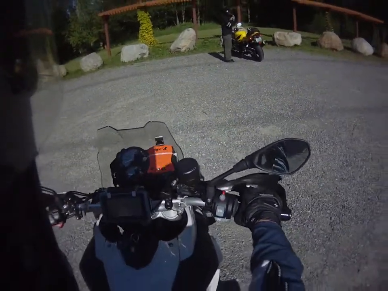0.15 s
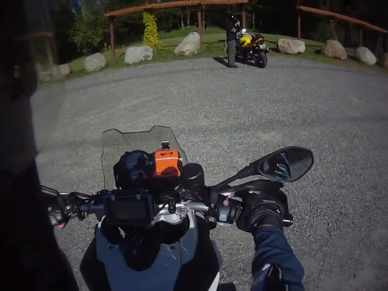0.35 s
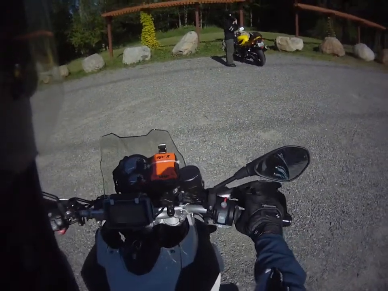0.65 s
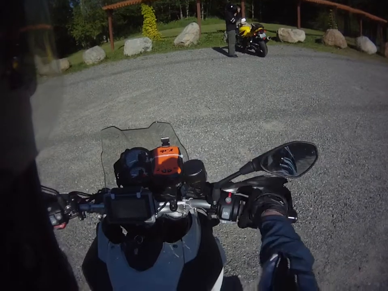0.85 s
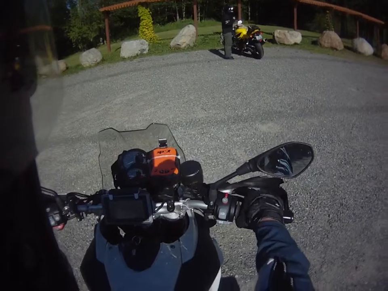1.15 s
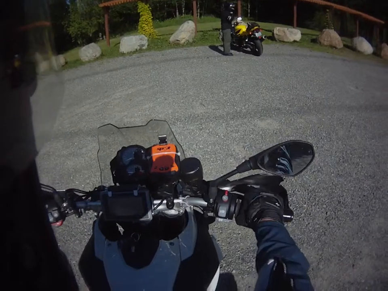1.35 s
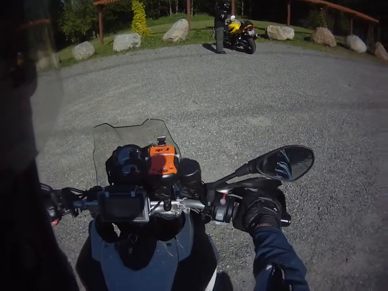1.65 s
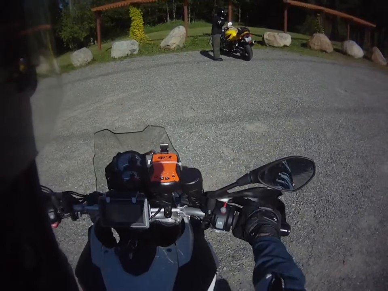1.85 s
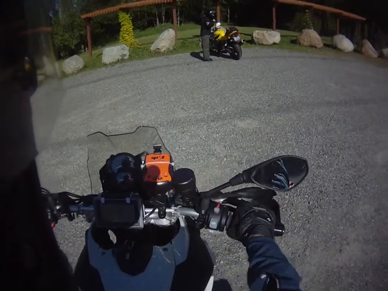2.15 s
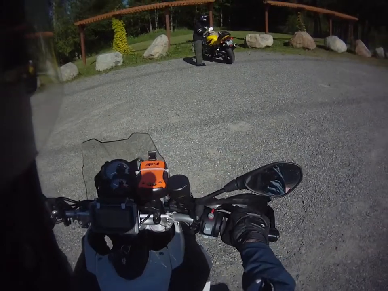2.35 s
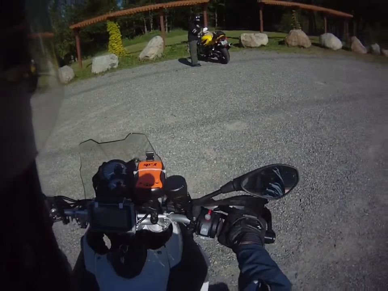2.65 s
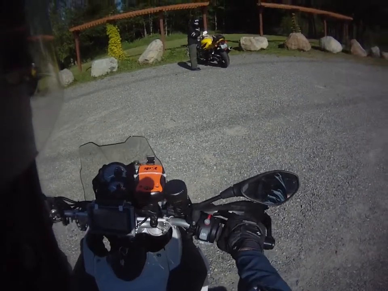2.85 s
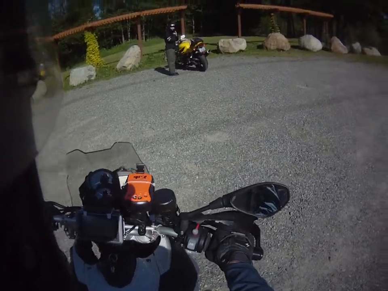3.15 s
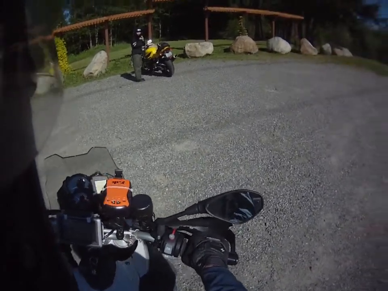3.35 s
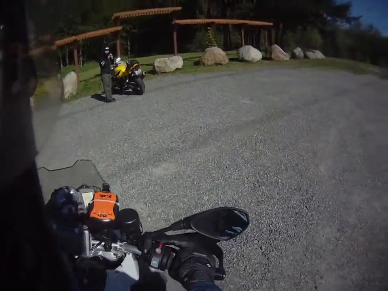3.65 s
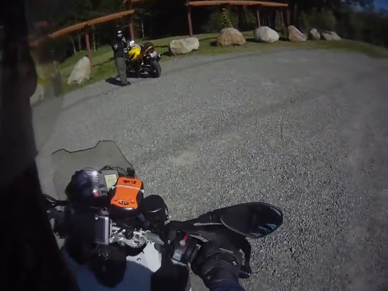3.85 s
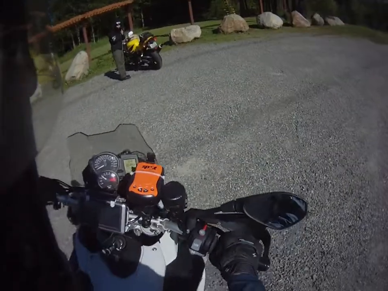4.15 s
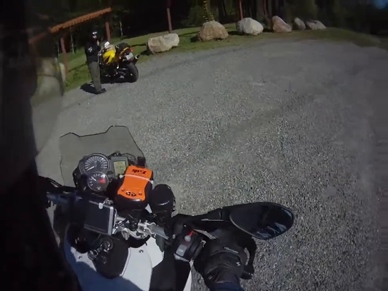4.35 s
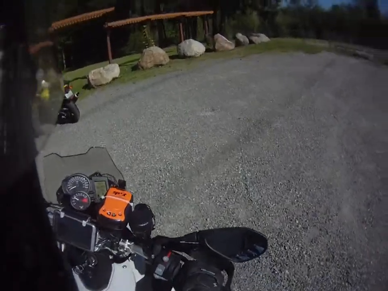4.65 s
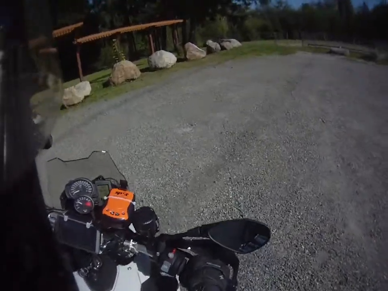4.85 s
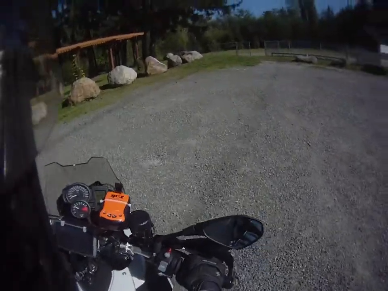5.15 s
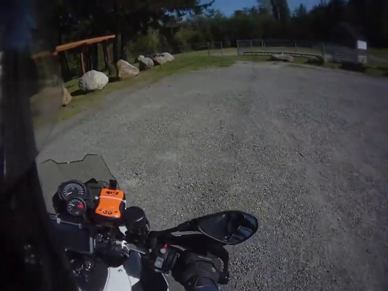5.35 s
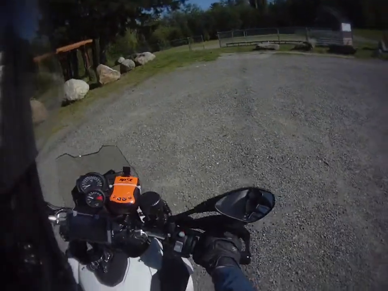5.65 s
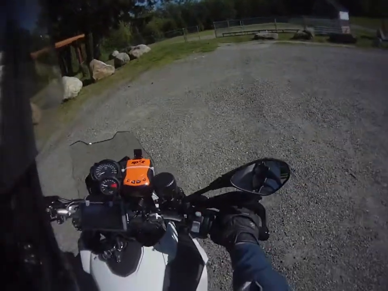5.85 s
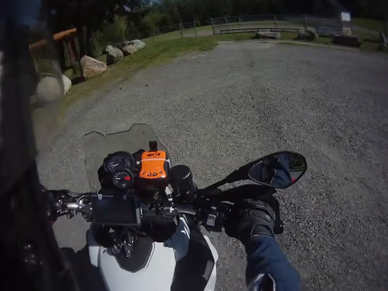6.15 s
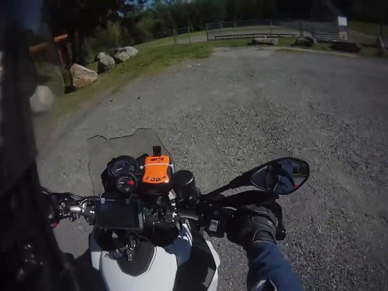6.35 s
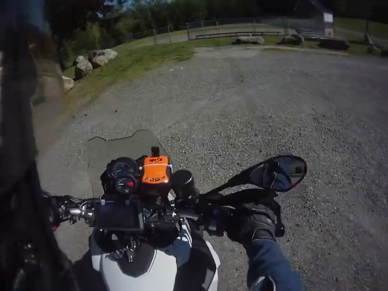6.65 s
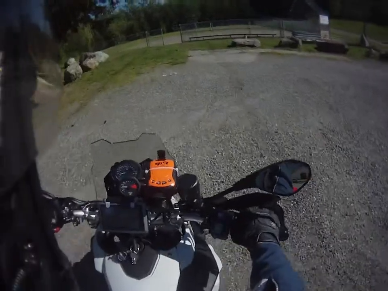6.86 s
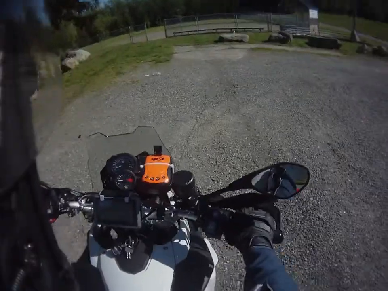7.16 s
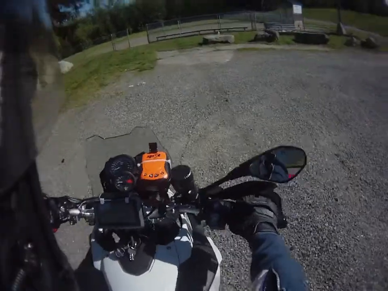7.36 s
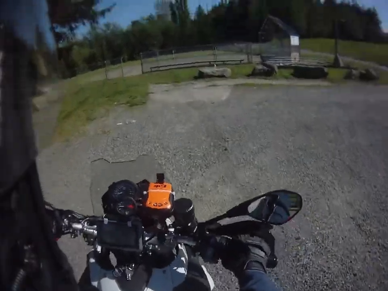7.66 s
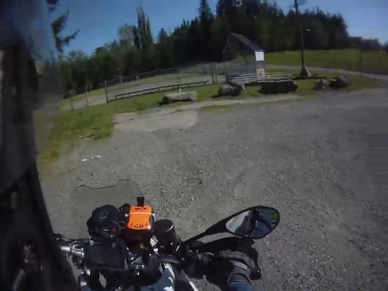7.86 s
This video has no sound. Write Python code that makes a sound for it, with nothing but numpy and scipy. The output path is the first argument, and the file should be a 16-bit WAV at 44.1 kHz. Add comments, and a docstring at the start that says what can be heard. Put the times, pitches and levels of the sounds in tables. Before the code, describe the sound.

A parallel-twin motorcycle idles outdoors with a low, lumpy chug and light valve ticking, heard close from the rider's helmet. At two seconds the throttle opens: the engine dips, then drones louder with a throaty intake honk, chain rattle and gear whine. It lugs lower, nearly stalls near six seconds, recovers to idle and coasts over crunching gravel with popping stones and small metallic pings.

```python
"""Motorcycle pulling away over gravel

A parallel twin, heard from the rider's helmet, idles, pulls away on a slipping clutch and coasts on.
Firing pulses excite the exhaust; with the throttle open, jolts of intake air make the airbox honk.
Knocks shake the block, tapped noise forms the valve gear, and phase-modulated tones whine as gears.
Filtered random grains are the gravel under the tyres, with short bursts for the popping stones."""
import sys
import numpy as np
from scipy import signal
from scipy.fft import rfft, irfft
from scipy.io import wavfile
from scipy.ndimage import uniform_filter1d

SR = 44100
rng = np.random.default_rng(int(sys.argv[2]) if len(sys.argv) > 2 else 0)


def bounce(signal):
    """Save signal as a 16-bit WAV file at the path given by the first command-line argument."""
    frames = np.transpose(np.atleast_2d(signal))
    limited = np.clip(frames, -1, 1)
    pcm = np.round(limited * 32767).astype(np.int16)
    wavfile.write(sys.argv[1], SR, pcm)


N = 352359
T = np.arange(N) / SR
IDLE_HZ = 42  # crank turns per second above which the engine counts as racing


def undb(db):
    """Amplitude ratio of a level: a factor of ten for every 20 dB."""
    return 10 ** (np.asarray(db) / 20)


def curves(table):
    """Linear interpolation in time of each column after the first."""
    s, *columns = np.transpose(table)
    return [np.interp(T, s, c) for c in columns]


def ramp(start_s, takes_s):
    """A linear transition from 0 to 1."""
    return np.clip((T - start_s) / takes_s, 0, 1)


def bump(x, centre, half_width):
    """A Gaussian bell of height 1, down to 1/e at the half width."""
    return np.exp(-((x - centre) / half_width) ** 2)


def tap(phase, rise):
    """A critically damped pulse peaking after `rise` turns; phase is the share of the two-turn cycle."""
    age = 2 * phase / rise
    return age * np.exp(1 - age)


def noise():
    """White noise: equal power at all frequencies."""
    return rng.standard_normal(N)


def wander(per_s):
    """Smoothed random steps: a slow drift with a spread near 1."""
    hold = int(SR / per_s)
    steps = rng.standard_normal(N)[np.arange(N) // hold]
    return 1.3 * uniform_filter1d(uniform_filter1d(steps, size=hold), size=hold)


def steady(x):
    """Normalisation by the running rms, smoothed over about a quarter second."""
    power = uniform_filter1d(uniform_filter1d(x * x, size=SR // 7), size=SR // 7)
    return x / np.sqrt(power + 1e-14)


def ring(x, hz, width_hz):
    """A single resonance with unit gain at its centre."""
    return signal.lfilter(*signal.iirpeak(hz, hz / width_hz, fs=SR), x)


def colour(x, points):
    """Minimum-phase filtering: a body of given response (frequency_hz, level_db) rings only after a blow."""
    size = 8192
    hz, db = np.transpose(points)
    bin_hz = np.arange(size // 2 + 1) * SR / size
    gain = undb(np.interp(np.log(bin_hz + 1), np.log(hz), db))
    # folding the cepstrum onto positive times makes the response causal
    cepstrum = irfft(np.log(gain))
    cepstrum[1:size // 2] *= 2
    cepstrum[size // 2 + 1:] = 0
    response = irfft(np.exp(rfft(cepstrum)))
    return signal.fftconvolve(x, response / np.linalg.norm(response))[:N]


def strokes(turn):
    """Periodic motion: share of the period gone by, cylinder (+1 or -1), two chance values held for it."""
    count = np.floor(turn).astype(int)
    chance = rng.standard_normal((count.max() + 4, 2))[count]
    cylinder = 1 - 2 * (count % 2)
    return turn % 1, cylinder, chance[:, 0], chance[:, 1]


def wraps(phase):
    """An impulse train: one unit pulse each time a phase starts over."""
    return (np.diff(phase, prepend=phase[0]) < 0) * 1.


def clicks(table, body, decay_s):
    """Exponentially decaying noise bursts, given as (start_s, level_db), excite a body."""
    cracks = sum(undb(db) * (T >= s) * np.exp(-np.abs(T - s) / decay_s) for s, db in table)
    return colour(cracks * noise(), body)


def firings(turn, body, at, lump_db, scatter_db, push=0, push_after=1 / 3):
    """Impulse excitation: a puff a turn from unequal cylinders, and a weaker piston push, ring a body."""
    phase, cylinder, chance, _ = strokes(turn - at)
    puffs = wraps(phase) + push * wraps((phase - push_after) % 1)
    puff_gain = undb(scatter_db * chance - cylinder * lump_db)
    return steady(colour(puffs * puff_gain, body))


def exhaust(turn, crank_hz, load):
    """Pipe resonance under pulses: it chugs lumpily at idle, evenly under load, and drones when lugging."""
    # exhaust response at idle, under load and lugging: frequency_hz, level_db (relative)
    idle_pipe = [(14, -17), (21, -17), (42, -5.5), (63, 7.5), (84, -0.5), (105, -9), (140, -10.5),
                 (168, -11), (188, -2.5), (215, -17), (300, -10.5), (500, -34.5), (1200, -81.5)]
    loaded_pipe = [(22, -23), (44, -1), (74, 14.5), (92, -4.5), (115, -5.5), (138, 5.5), (160, 0),
                   (180, -8), (206, 2), (232, 5), (275, -2), (350, -8.5), (550, -12.5), (800, -14.5),
                   (1400, -65)]
    lugging_pipe = [(22, -28), (35, -5), (68, 5), (102, 4), (136, 0.5), (170, -19), (203, 9), (238, -0.5),
                    (275, -2), (350, -9.5), (550, -11), (800, -20.5), (1400, -65)]
    idling = -firings(turn, idle_pipe, at=0.251, lump_db=3.0, scatter_db=1.0)
    pulling = firings(turn, loaded_pipe, at=.58, lump_db=0.23, scatter_db=1.0, push=0.13)
    lugging = firings(turn, lugging_pipe, at=0.84, lump_db=0.4, scatter_db=0.0)
    lug_hz, lug_span_hz = 39.44, 3  # lugging sets in below this crank speed, over this span
    lug = np.clip((lug_hz - crank_hz) / lug_span_hz, 0, 1)
    pipe = (1 - load) * idling + load * ((1 - lug) * pulling + lug * lugging)
    # an all-pass: a chamber holds part of each puff back and spreads it out in time
    return steady(2 * ring(pipe, hz=160, width_hz=90) - pipe)


def intake(turn, crank_hz):
    """Impulsive excitation of airbox modes: jolts fall in and out of step with the ring, so it throbs."""
    # jolts as an inlet valve opens, throttles and shuts the stream, one list for each cylinder:
    # place_turns (in the two-turn cycle), strength (suction positive)
    jolts_by_cylinder = [
        [(1.695, 2.5), (1.995, -1.39), (2.129, -0.3), (2.265, -0.2)],
        [(.682, 1.62), (.976, -1.66), (1.1, -.65), (1.295, 0.92)],
    ]
    # airbox and duct modes as each cylinder meets them: frequency_hz, width_hz, gain (signed)
    modes_by_cylinder = [
        [(473, 29.3, 1.384), (519.4, 37, -0.67), (643, 78, -0.116), (711, 35, -0.088)],
        [(471.1, 19.5, 1.45), (543.8, 43.7, -0.57), (626.6, 100, -0.132)],
    ]
    # air drawn in, with a last gulp as the engine recovers: time_s, level_db
    air_level = [(2.0, -54), (2.1, -24), (2.16, -13.5), (2.26, -8), (2.36, -9), (2.5, -9.5), (2.9, -11.5),
                 (3.2, -6.5), (3.6, -7), (4.3, -7), (5.1, -7), (5.4, -9.5), (5.72, -12), (5.78, -17.5),
                 (5.82, -20.5), (5.87, -26), (5.95, -23), (6.1, -58)]
    lug_hz = 39.5
    jolt_s, jitter_s, scatter_db = 0.00037, .00005, 1.12
    rush_db, rush_hz, rush_width_hz = -15, 520, 220
    honk = 0
    for jolts, modes in zip(jolts_by_cylinder, modes_by_cylinder):
        push = 0
        opens = jolts[0][0]
        for place, strength in jolts:
            # when the engine lugs, the jolts keep their spacing in time
            place = opens + (place - opens) * np.minimum(crank_hz / lug_hz, 1)
            phase, _, size, late = strokes((turn - place + 1) / 2)
            after_s = (2 * phase - 1) / crank_hz
            push = push + strength * undb(scatter_db * size) * bump(after_s, jitter_s * late, jolt_s)
        honk = honk + sum(gain * ring(push, hz, width) for hz, width, gain in modes)
    hiss = ring(ring(noise(), rush_hz, rush_width_hz), rush_hz, rush_width_hz)
    rush = uniform_filter1d(np.abs(honk), size=200) * steady(hiss)
    high_pass = signal.butter(4, 300, "high", fs=SR, output="sos")
    low_pass = signal.butter(6, 850, fs=SR, output="sos")
    air = signal.sosfilt(high_pass, honk + undb(rush_db) * rush)
    air_db, = curves(air_level)
    return signal.sosfilt(low_pass, air) * undb(air_db)


def block(turn, crank_hz, load):
    """Forced vibration: knocks ring the crankcase and set off chatter that repeats more under load."""
    # knocks: place_turns (in the two-turn cycle), rise_turns, level_db (relative), ringing_hz
    knocks = [(0.198, 0.15, -2.5, 500), (0.429, 0.18, -2, 628), (1.173, 0.17, 0.5, 427.4),
              (1.6, 0.18, -1, 489)]
    # response of the block: frequency_hz, level_db (relative)
    block_response = [(100, -9), (140, -5.5), (200, -6.5), (310, -13.5), (410, -2), (480, -2), (560, -2.5),
                      (690, -11), (790, -12), (940, -24), (1010, -19.5), (1150, -32), (1800, -38)]
    idle_db, load_db = -47.0, -45
    scatter_db, ring_db, ring_spread = 1, -2, 0.025
    repeat_db, repeat_load_db = -12, 11  # repeating chatter at idle, and what load adds
    force, rings = 1.0, 0  # the force starts from a constant bed
    for place, rise, db, hz in knocks:
        phase, _, size, detune = strokes((turn - place) / 2)
        knock = undb(db + scatter_db * size) * tap(phase, rise)
        force = force + knock
        ringing_hz = hz * (1 + ring_spread * detune)
        rings = rings + knock * np.sin(2 * np.pi * ringing_hz * 2 * phase / crank_hz)
    # one random pattern, read again in every two-turn cycle
    places = np.linspace(0, 2, 256)
    pattern = np.interp(turn % 2, places, rng.standard_normal(len(places)))
    band = signal.butter(2, [140, 2500], "band", fs=SR, output="sos")
    loose = signal.sosfilt(band, noise())
    chatter = force * (steady(loose) + undb(repeat_db + repeat_load_db * load) * steady(pattern))
    shaken = steady(colour(chatter, block_response)) + undb(ring_db) * steady(rings)
    return steady(shaken) * undb(idle_db + (load_db - idle_db) * load)


def valve_gear(turn, load):
    """Amplitude-modulated noise: valves tap in a fixed order over the cam chain's rustle in the covers."""
    # valves closing: place_turns (in the two-turn cycle), level_db (relative), ringing_hz
    valves = [(.19, 4, 2464), (0.419, -5.5, 3800), (.96, -7, 4010), (1.31, 5, 2574), (1.419, 6, 4020),
              (1.569, 5, 2530), (1.588, 0, 4070)]
    # response of the valve gear: frequency_hz, level_db (relative)
    rustle_response = [(1000, -13), (1450, -12.5), (2000, -5), (2350, -2), (2580, 2), (2850, -4.5),
                       (3150, -3), (3450, -9), (3750, -2), (4100, 0.5), (4600, -7), (5400, -19.5),
                       (6400, -14.5), (8200, -18), (10000, -30)]
    # resonances of the engine covers: frequency_hz, width_hz, level_db (relative)
    cover_modes = [(1864, 120, -8.5), (2578, 43, -3.5), (3220, 79, -8.5), (4850, 160, -17.5)]
    rise_turns, tap_width_hz, cover_db = 0.054, 600, -7.0
    idle_chain, load_chain = 1.22, 2.5  # gain of the chain rustle
    taps = 0
    for place, db, hz in valves:
        phase, *_ = strokes((turn - place) / 2)
        body = ring(ring(noise(), hz, tap_width_hz), hz, tap_width_hz)
        taps = taps + body / body.std() * undb(db) * tap(phase, rise_turns)
    cover_noise = sum(undb(db) * ring(noise(), hz, width) for hz, width, db in cover_modes)
    covers = ring(cover_noise, hz=2780, width_hz=1200)
    rustle = steady(colour(noise(), rustle_response)) + undb(cover_db) * steady(covers)
    chain = (idle_chain + (load_chain - idle_chain) * load) * rustle
    # the chain whips once in four turns
    return steady((taps + chain) * (1 + .08 * np.sin(np.pi * turn / 2)))


def chain_slap(turn):
    """Repeated impact: the loaded cam chain slaps its guide each cycle, and one cover resonates."""
    # slaps: place_turns (in the two-turn cycle), level_db (relative)
    slaps = [(0.151, -5.5), (0.359, 0), (.72, -0.5), (1.059, 2), (1.32, -3.5), (1.56, -3.5)]
    # course of the slapping: time_s, level_db (relative)
    slap_level = [(2.05, -84), (2.25, -57.5), (2.75, -65), (2.95, -52), (3.15, -60.5), (3.33, -54.5),
                  (3.6, -73), (3.85, -60), (4.05, -54), (4.25, -60), (4.5, -63), (5.0, -67), (5.22, -65),
                  (5.55, -56), (5.7, -69), (5.9, -80)]
    decay_turns, scatter_db = 0.18, 2
    hit_hz, hit_width_hz, cover_db, level_db = 2600, 650, -2, -2
    force = 0
    for place, db in slaps:
        phase, _, size, _ = strokes((turn - place) / 2)
        force = force + undb(db + scatter_db * size) * np.exp(-2 * phase / decay_turns)
    hits = ring(ring(force * noise(), hit_hz, hit_width_hz), hit_hz, hit_width_hz)
    cover = ring(hits, hz=2572, width_hz=55)
    slap_db, = curves(slap_level)
    return steady(steady(hits) + undb(cover_db) * steady(cover)) * undb(slap_db + level_db)


def injector(turn, load):
    """Gated band noise: a fine, bright tick once a cycle, whose place in the cycle moves with load."""
    at_turns, load_shift_turns, rise_turns = .3, 0.82, 0.048
    idle_db, load_db = -66, -64
    tick_hz, tick_width_hz = 7300, 4000
    phase = (turn - at_turns - load_shift_turns * load) / 2 % 1
    spit = steady(ring(ring(noise(), tick_hz, tick_width_hz), tick_hz, tick_width_hz))
    return spit * tap(phase, rise_turns) * undb(idle_db + (load_db - idle_db) * load)


def gears(turn, crank_hz, torque):
    """Tooth meshing: the loaded primary gear whines, wavering each turn, louder at a cover resonance."""
    teeth = 35
    level_db, racing_db = -60, -0.5  # the second is added per turn per second above idle
    mesh_db, cover_db = -12, -9  # the fundamental against its octave, and the cover's share
    blur = steady(signal.sosfilt(signal.butter(2, 45, fs=SR, output="sos"), noise()))
    judder = 1.5 * np.sin(2 * np.pi * turn) / 2
    mesh = 2 * np.pi * teeth * turn + judder + 0.67 * blur
    whine = undb(mesh_db) * np.sin(mesh) + np.sin(2 * mesh)
    cover = ring(whine, hz=2600, width_hz=120)
    gear_db = level_db + racing_db * np.maximum(crank_hz - IDLE_HZ, 0)
    return (whine + undb(cover_db) * cover) * torque * undb(gear_db)


def gearbox(turn):
    """Modulated carrier: slow noise roughens the driven gears' whine, which throbs with the firings."""
    # the whine climbs with road speed until the clutch locks, then sinks with the engine:
    # time_s, pitch_hz, level_db (relative)
    whine_course = [(4.5, 2560, -75), (4.78, 2670, -60), (5.0, 2765, -57.5), (5.15, 2785, -55.5),
                    (5.3, 2660, -57), (5.5, 2490, -61), (5.7, 2260, -69), (5.85, 2100, -85)]
    throb, level_db = 0.38, -3.5
    hz, db = curves(whine_course)
    blur = signal.sosfilt(signal.butter(4, 55, fs=SR, output="sos"), noise())
    carrier = np.sin(2 * np.pi * np.cumsum(hz) / SR)
    whine = blur * carrier * (1 + throb * np.cos(2 * np.pi * turn))
    return steady(whine) * undb(db + level_db)


def pings():
    """Resonance excited near its own pitch: short blows ring one cover while coasting."""
    # harder taps: start_s, level_db (before the cover's resonance)
    blow_list = [(6.474, -37), (6.565, -42), (7.131, -40), (7.222, -40), (7.897, -46)]
    hz, width_hz, decay_s = 2590, 60, 0.0021
    blows = sum(undb(db) * (T >= s) * np.exp(-np.abs(T - s) / decay_s) for s, db in blow_list)
    return ring(blows * np.sin(2 * np.pi * hz * T), hz, width_hz)


def ticks():
    """Impulsive noise: sharp ticks of the machine, coloured by its response."""
    # ticks: start_s, level_db (before colouring)
    tick_list = [(.812, -50), (5.914, -52), (6.39, -51), (7.898, -58)]
    # response to a tick: frequency_hz, level_db (relative)
    tick_response = [(600, -20), (1200, 4), (2200, 9), (2600, 9), (3100, -4), (4200, -12), (6000, -22),
                     (12000, -23)]
    return clicks(tick_list, tick_response, decay_s=0.0068)


def squeak():
    """Frictional vibration: rubbing metal of the running gear sings faintly for an instant, with its octave."""
    start_s, length_s, hz, level_db, octave_db = 7.233, .042, 5680, -72, -4
    swell = np.sqrt(np.abs(np.sin(np.pi * np.clip((T - start_s) / length_s, 0, 1))))
    tone = np.sin(2 * np.pi * hz * T)
    octave = np.sin(2 * np.pi * 2 * hz * T)
    return undb(level_db) * swell * (tone + undb(octave_db) * octave)


def gravel():
    """Granular noise: random stone impacts grind under the tyres, louder as the motorcycle gathers way."""
    # response of the gravel: frequency_hz, level_db (relative)
    gravel_response = [(80, -11.5), (200, -5), (330, -4.5), (480, 3.5), (620, 1.5), (800, -9.5),
                       (1100, -14), (1600, -24.5), (2600, -26), (4200, -34), (6000, -52), (12000, -51)]
    # patches of looser gravel: centre_s, half_length_s, extra_db
    loose_patches = [(6.098, 0.24, 4), (7.51, 0.074, 0.5), (7.722, 0.63, 3.5)]
    grains_per_s, roll_db = 700, -53.5
    grains = (rng.random(N) < grains_per_s / SR) * noise()
    loose_db = sum(db * bump(T, s, half_s) for s, half_s, db in loose_patches)
    moving = ramp(start_s=1.3, takes_s=3.2)
    return steady(colour(grains, gravel_response)) * moving * undb(roll_db + loose_db)


def stones():
    """Impulsive noise: single stones pop from under the tyres."""
    # pops: start_s, level_db (relative)
    pop_list = [(3.8652, -28), (5.3284, -30), (5.912, -37), (5.946, -37), (6.3894, -35), (6.6072, -40),
                (7.0681, -32), (7.25, -36.5), (7.385, -34), (7.471, -30.5), (7.531, -33.5), (7.582, -33),
                (7.636, -34.5), (7.727, -36)]
    # response to a pop: frequency_hz, level_db (relative)
    stone_response = [(200, -4.5), (550, 18), (900, 0), (1400, -14), (2600, -18), (4200, -21.5),
                      (6000, -33), (12000, -46)]
    return undb(-2.5) * clicks(pop_list, stone_response, decay_s=0.0073)


def scene():
    """Superposition: crank speed, throttle and clutch drive the engine sounds; the tyres add the ground."""
    # the twin fires once a turn, the cylinders taking turns: time_s, crank_hz (turns per second)
    crank_course = [(0.0, 41.76), (2.06, 42.1), (2.15, 32.59), (2.3, 41.25), (2.42, 46.09), (2.56, 47.57),
                    (2.68, 45.69), (2.88, 40.82), (2.98, 40.63), (3.15, 42.7), (3.35, 45.74), (3.6, 46.34),
                    (4.15, 45.59), (4.45, 43.4), (4.68, 39.71), (5.08, 39.46), (5.3, 36.59), (5.48, 33.7),
                    (5.62, 34.05), (5.8, 28.44), (6.02, 41.39), (6.39, 44.99), (6.63, 42.75), (7.99, 41.2)]
    crank_hz, = curves(crank_course)
    # the rider opens the throttle once and shuts it again
    throttle = ramp(start_s=2.027, takes_s=0.19) * (1 - ramp(start_s=5.635, takes_s=0.34))
    # nearly stalled, the engine briefly takes load and recovers
    gulp = .45 * bump(T, centre=5.955, half_width=.035)
    load = np.clip(throttle + gulp, 0, 1)
    # at idle the crank hunts ahead and behind, by a spread in turns
    turn = np.cumsum(crank_hz) / SR + .028 * (1 - load) * wander(per_s=5)
    # the clutch first drags and loads the gears, then bites so that the engine pulls
    torque = load * ramp(start_s=1.9, takes_s=0.24)
    pull = load * ramp(start_s=2.96, takes_s=0.11)
    racing = np.maximum(crank_hz - IDLE_HZ, 0)
    # idle level, then what load, each extra turn per second and the pull add, in dB
    exhaust_db = -53 + (6.5 + 0.52 * racing) * load + 3 * pull
    # idle level, then what the throttle and each extra turn per second add, in dB
    valve_db = -60 + 6 * throttle + 0.42 * racing
    engine = exhaust(turn, crank_hz, load) * undb(exhaust_db)
    engine = engine + intake(turn, crank_hz) + block(turn, crank_hz, load)
    head = valve_gear(turn, load) * undb(valve_db) + chain_slap(turn) + injector(turn, load)
    metal = head + gearbox(turn) + gears(turn, crank_hz, torque) + ticks() + pings()
    ground = gravel() + stones()
    return (engine + metal + ground + squeak())[None]


def record(dry):
    """Additive noise and band limiting: a faint hiss joins and a steep low-pass cuts the top."""
    hiss_db, top_hz = -72, 15150
    low_pass = signal.ellip(12, .2, 80, top_hz, fs=SR, output="sos")
    return signal.sosfilt(low_pass, dry + undb(hiss_db) * noise())


dry = scene()
out = record(dry)
bounce(out)
```